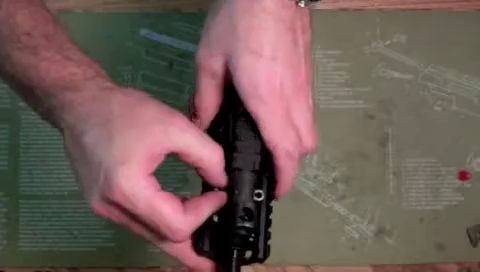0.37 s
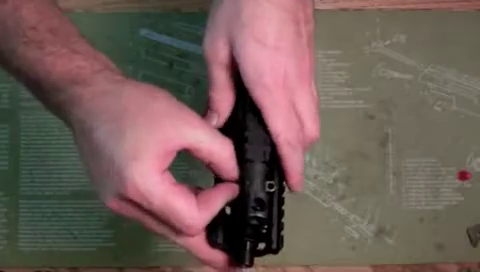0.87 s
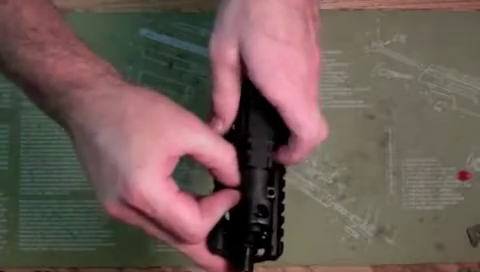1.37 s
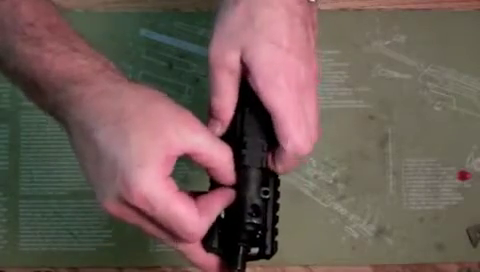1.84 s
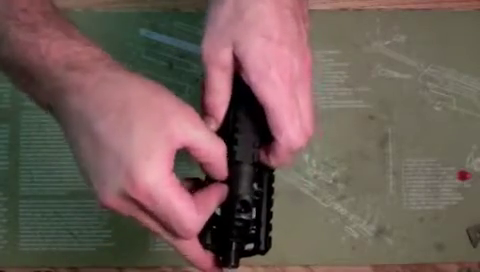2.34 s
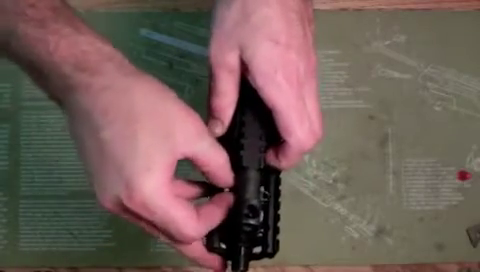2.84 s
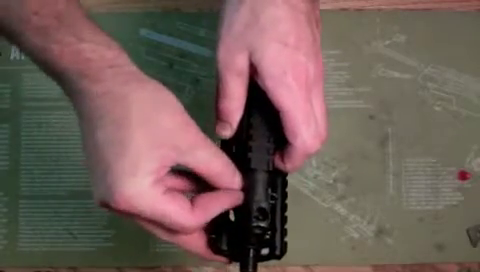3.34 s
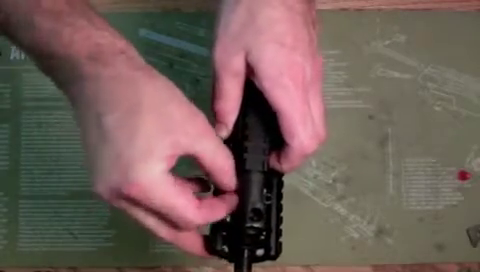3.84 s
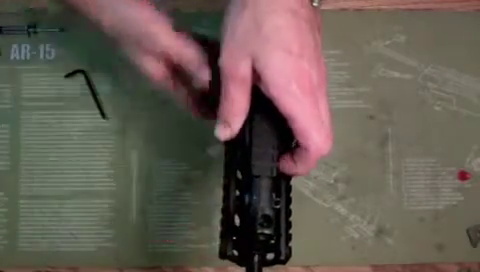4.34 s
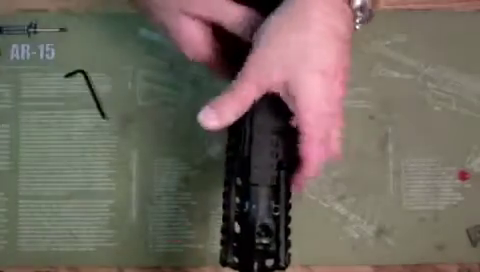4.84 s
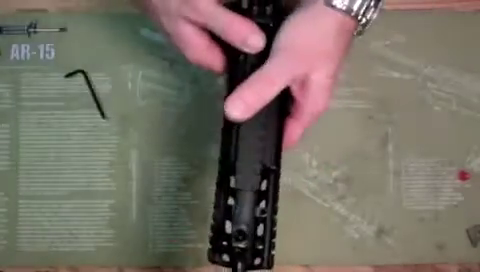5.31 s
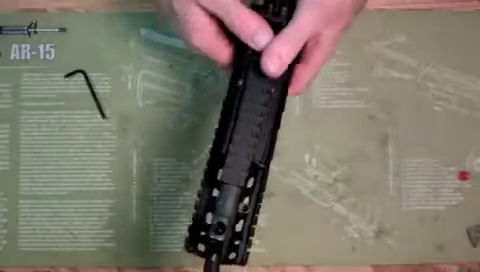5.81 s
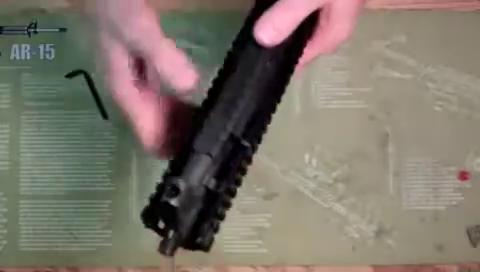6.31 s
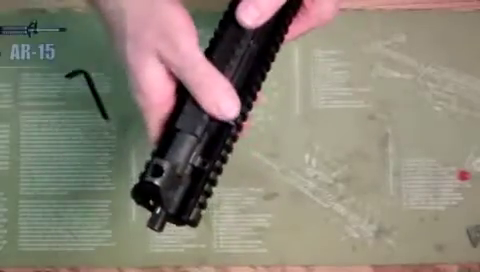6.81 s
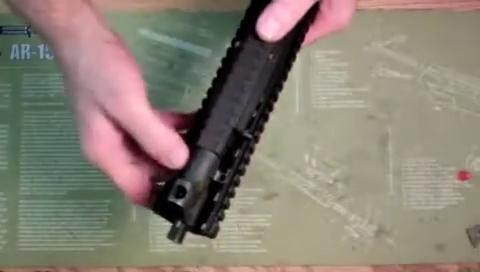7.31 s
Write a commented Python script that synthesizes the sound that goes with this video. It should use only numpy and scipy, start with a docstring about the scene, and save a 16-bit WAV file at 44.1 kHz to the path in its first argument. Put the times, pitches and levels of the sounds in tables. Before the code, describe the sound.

A close stereo microphone in a small quiet room, with steady soft hiss and faint low hum throughout. From 0 to 1 s, light skin brushing and faint dull taps on a padded bench. At 1.2 s a bright small tick and a brush of skin, then a paired click at 1.7 s. From 2.1 to 2.9 s, sharp, dry metal snaps, loudest at 2.2 and 2.4 s, with gritty thread slips between. From 3.3 to 3.7 s, a dense run of grinding creaks and scrapes. Around 4.0 s a small steel key lands with a quick double clink and a very high, fluttering ping. From 4.4 to 6.3 s, mostly soft hand rubbing, with a dull knock at 4.8 s and a tick at 5.3 s. Muffled taps come near 6.5 s, then a short metal slip at 7.4 s and a faint final tap as low rumble rises slightly.

```python
"""Padded bench in a small quiet room: hands loosen and slide the parts of a slotted metal tube.
Knocks, slips and scrapes ring damped tube and bench modes; loose parts tick on single modes.
A small steel key pings with a beating pair of modes; skin brushes metal and mat as shaped noise.
Microphone hiss, faint hums and low room tone lie beneath; random echoes scatter the metal sounds."""
import sys
import numpy as np
from scipy import signal
from scipy.fft import rfft, irfft
from scipy.io import wavfile
from scipy.ndimage import uniform_filter1d

SR = 44100
rng = np.random.default_rng(int(sys.argv[2]) if len(sys.argv) > 2 else 0)


def voltage_ratio(level):
    """Linear amplitude factor for a level in decibels (scalar or array-like)."""
    return 10 ** (np.asarray(level, float) / 20)


def master_out(mix):
    """Clip the mix to full scale and print it as 16-bit PCM to the path in sys.argv[1]."""
    frames = np.transpose(np.atleast_2d(mix))
    ceiling = np.clip(frames, -1, 1)
    pcm = np.round(ceiling * 32767).astype(np.int16)
    wavfile.write(sys.argv[1], SR, pcm)


N = 338688  # samples


def evened(x):
    """Scales to rms 1."""
    return x / np.sqrt(np.mean(x ** 2) + 1e-20)


def read(points, hz):
    """Reads a curve on a log-frequency axis."""
    point_hz, value = np.transpose(points)
    return np.interp(np.log(hz + 1), np.log(point_hz + 1), value)


def add(mix, s, sound):
    """Mixes a sound in at time s."""
    part = mix[round(s * SR):][:len(sound)]
    part += sound[:len(part)]


def band(x, lo_hz, hi_hz):
    """Band-pass."""
    return signal.sosfilt(signal.butter(2, [lo_hz, hi_hz], "bandpass", fs=SR, output="sos"), x)


def hiss(spectrum, same, patchy_db):
    """Two-channel noise of a given colour and left-right likeness, in faint random patches."""
    hz = np.fft.rfftfreq(2048, 1 / SR)
    a, b, c, d, patches = rng.standard_normal((N // 512 + 5, 1025, 5)).T
    patches = uniform_filter1d(patches, size=20, axis=0)
    patches = evened(uniform_filter1d(patches, size=5, axis=1))
    same = np.clip(read(same, hz), -1, 1)[:, None]
    left = a + 1j * b
    right = same * left + np.sqrt(1 - same ** 2) * (c + 1j * d)
    z = np.array([left, right]) * voltage_ratio(read(spectrum, hz)[:, None] + patchy_db * patches)
    return evened(signal.istft(z, nperseg=2048, noverlap=1536)[1][:, :N])


FOOT_DB = -17  # where a stroke's rise starts and its fall ends


def stroke(rows):
    """Gain over time: every stroke rises, holds and falls away."""
    t, gain = np.arange(N) / SR, np.zeros(N)
    for s, rise_s, hold_s, fall_s, db in rows:
        corners_s = np.cumsum([s - rise_s, rise_s, hold_s, fall_s])
        shape_db = np.interp(t, corners_s, [FOOT_DB, 0, 0, FOOT_DB])
        gain += voltage_ratio(db) * (voltage_ratio(shape_db) - voltage_ratio(FOOT_DB))
    return gain


def ring(modes, phase=0):
    """Impulse response of a set of dying modes, 1/12 s long."""
    hz, db, t60 = np.transpose(modes)[:, :, None]
    t = np.arange(SR // 12) / SR
    return (voltage_ratio(db - 60 * t / t60) * np.sin(2 * np.pi * (hz * t + phase))).sum(0)


def cluster(modes, luck, spread, uneven_db, tilt_db=0):
    """Each mode is a family of three close neighbours; grip and place shift and weigh them anew."""
    hz, db, t60 = np.repeat(modes, 3, axis=0).T
    shift, weight, phase = luck[:, :len(hz)]
    db = db + uneven_db * weight + tilt_db * np.clip(np.log2(hz / 3100) / 1.48, 0, 1)
    return ring(np.transpose([hz * (1 + spread * shift), db, t60]), phase[:, None])


def echoes(x, decay, first):
    """Sparse random-sign taps from sample `first` on, each band dying at its own speed.
    The work moves about, so three such paths take turns."""
    taps = np.zeros((3, 2, SR // 2))
    at = np.arange(first, SR // 2 - 20, 20)
    at_jittered = at + rng.integers(0, 20, (3, 2, len(at)))
    np.put_along_axis(taps, at_jittered, rng.choice([-1., 1.], (3, 2, len(at))), 2)
    hz, t, z = signal.stft(taps, SR, nperseg=128)
    tail = signal.istft(z * voltage_ratio(-60 * t / read(decay, hz)[:, None]), SR, nperseg=128)[1]
    tail = signal.lfilter([1, -.6], 1, tail)  # small hard things scatter the treble most
    path = np.arange(3)[:, None, None]
    turns = np.sqrt(2 / 3) * np.cos(np.pi * (7 * np.arange(N) / SR + path / 3))
    return signal.oaconvolve(x * turns, tail / np.linalg.norm(tail[0, 0]), axes=2)[..., :N].sum(0)


# Hiss colour. Each row: frequency in Hz, relative density in dB per Hz.
HISS_COLOUR = [(12, -29), (20, -8.5), (63, -11.5), (86, -13), (196, -14.5), (244, -5), (280, -11.5),
               (390, -10.5), (513, -11), (940, -8), (1380, -12.5), (3330, -11.5), (4150, -12), (7000, -12),
               (14300, -10.5)]
# Hiss across the microphone pair. Each row: frequency in Hz, left-right likeness (0 to 1).
HISS_LIKENESS = [(60, 0.81), (150, 0), (380, 0.49), (950, 0.37), (2370, 0.069), (5960, 0), (14900, 0.0)]
# Wavering hum lines. Each row: centre in Hz, width in Hz, level in dB.
HUMS = [(57.9, 4.1, -77), (245.5, 25, -75.5), (7870, 33, -75.5), (13950, 300, -69.5)]
HISS_DB, RUMBLE_DB = -54, -67.5
SWELL_S, SWELL_DB_PER_S = 7.45, 34  # the low rumble swells from SWELL_S on


def room_tone():
    """Noise sources: microphone hiss and air, narrow wavering hums, low rumble."""
    out = voltage_ratio(HISS_DB) * hiss(HISS_COLOUR, HISS_LIKENESS, patchy_db=1.45)
    for hz, width_hz, db in HUMS:
        out += voltage_ratio(db) * evened(band(rng.standard_normal(N), hz - width_hz / 2, hz + width_hz / 2))
    swell_db = SWELL_DB_PER_S * np.maximum(np.arange(N) / SR - SWELL_S, 0)
    rumble = evened(band(rng.standard_normal((2, N)), 86, 584))
    return out + voltage_ratio(RUMBLE_DB + swell_db) * rumble


# Wall decay. Each row: frequency in Hz, t60 in s.
WALL_DECAY = [(300, 0.44), (2500, 0.2), (8000, 0.18), (14000, 0.079)]


def wall_echoes(x):
    """Late diffuse return from the walls, after 200 samples."""
    return voltage_ratio(-7.5) * echoes(x, WALL_DECAY, first=200)


# Decay of scatter from hands and bench. Each row: frequency in Hz, t60 in s.
NEAR_DECAY = [(1000, 0.15), (10000, 0.054)]


def near_scatter(x):
    """Early return from hands and bench, after 4 samples."""
    return voltage_ratio(-5) * echoes(x, NEAR_DECAY, first=4)


# Skin over metal and mat. Each row: full from in s, rise in s, hold in s, fall in s, level in dB.
BRUSH_STROKES = [(0.005, .005, 0.011, .08, -58.5), (0.15, .02, .11, .02, -58),
                 (0.33, .03, 0.095, .03, -61.5), (1.19, .02, .125, 0.033, -52),
                 (4.43, .03, 0.049, .03, -54), (4.498, 0.035, 0.0089, 0.11, -48.5),
                 (4.662, 0.027, .005, 0.062, -50.5), (4.94, 0.17, 0.14, .1, -54.5),
                 (5.51, 0.16, 0.15, .07, -55), (5.78, 0.048, 0.15, .11, -54.5),
                 (6.066, 0.072, 0.018, .12, -54.5), (6.198, .02, .01, .08, -57),
                 (6.96, 0.13, .03, .14, -57.5)]
# Skin noise colour. Each row: frequency in Hz, relative density in dB per Hz.
SKIN_COLOUR = [(880, -14), (1500, -4), (2720, -3), (3750, 0.5), (8920, -0.5), (13500, 6), (14300, -27)]


def brushing():
    """Soft broad hiss, slightly lumpy as skin sticks and slips."""
    lumps = evened(uniform_filter1d(rng.standard_normal(N), size=300))
    skin = hiss(SKIN_COLOUR, [(1000, 0.44), (14000, 0.17)], patchy_db=1.5)
    return skin * stroke(BRUSH_STROKES) * voltage_ratio(1.5 * lumps)


# Key landing and bouncing, a brief flare of loudness per contact.
# Each row: time in s, left dB, right dB.
BOUNCES = [(4.0116, -7.3, -14), (4.0178, -10.8, -11)]
# Close pair of key modes. Each row: frequency in Hz, left dB, right dB, t60 in s.
KEY_MODES = [(13364, -4.2, -6.4, .104), (13340, -12, -8.2, .104)]
# Times in s at which the pair cancels: left, right.
BEAT_NULL_S = [4.0497, 4.059]
FLARE_S, KEY_RISE_S = .0019, .004
KEY_LEAD_TURNS = 0.2  # right ahead of left, in turns


def key():
    """Two very high steel modes beat as they die; each side has its own level and phase."""
    t = np.arange(SR // 4) / SR
    start_s = BOUNCES[0][0] - 2 * FLARE_S
    rise = np.minimum(t / KEY_RISE_S, 1) ** 2
    (hz, *main_db, main_t60), (twin_hz, *twin_db, twin_t60) = KEY_MODES
    main = voltage_ratio(np.c_[main_db] - 60 * t / main_t60) * rise
    for s, *sides_db in BOUNCES:
        main += voltage_ratio(np.c_[sides_db]) * np.exp(-((t + start_s - s) / FLARE_S) ** 2) * (t > 0)
    twin = voltage_ratio(np.c_[twin_db] - 60 * t / twin_t60) * rise
    turns = hz * t + np.c_[[0, KEY_LEAD_TURNS]]
    slip = (twin_hz - hz) * (t + start_s - np.c_[BEAT_NULL_S])
    ping = main * np.sin(2 * np.pi * turns) - twin * np.sin(2 * np.pi * (turns + slip))
    out = np.zeros((2, N))
    out[:, round(start_s * SR):][:, :len(t)] = ping
    return out


# Loose small part, one pitch per tick. Each row: time in s, peak in dB before mixing, Hz, t60 in s.
TICKS = [(0.5457, -54, 730, 0.041), (0.6255, -43, 694, .025), (1.16, -32, 4640, 0.094),
         (4.665, -44.5, 5490, 0.071), (5.307, -36, 860, 0.022)]


def ticks():
    """One mode and the dry click of contact, rising over a few cycles."""
    out = np.zeros(N)
    for s, peak_db, hz, t60 in TICKS:
        sound = ring([(hz, 0, t60), (2200, -3, .01)])
        sound *= 1 - np.exp(-np.arange(len(sound)) / SR * hz / 4.3)
        add(out, s - .001, voltage_ratio(peak_db) * sound / abs(sound).max())
    return out


# Bench under the mat, most modes nearly dead. Each row: Hz, relative level in dB, t60 in s.
BENCH = [(386, 1, 0.031), (490, 1, 0.0043), (754, -6.5, 0.0061), (1098, -6, 0.11), (1150, -22.5, 0.032),
         (1400, -6.5, 0.069), (2090, 3.5, 0.044)]


def bench_ring(luck):
    """Impulse response of the padded bench."""
    return cluster(BENCH, luck, spread=0.1117, uneven_db=2.5)


# Tube modes, damped by the gripping hand. Each row: Hz, relative level in dB, t60 in s.
TUBE = [(1710, -12, 0.14), (2040, -12, 0.17), (2277, -2, 0.04), (2410, -6.5, 0.038), (2530, 1, 0.047),
        (2703, 5, 0.011), (2970, -1.5, 0.024), (3074, 5.5, 0.023), (3240, 1.5, 0.0076), (3756, 5, 0.02),
        (3950, 1, 0.032), (4650, 0.5, 0.022), (5490, 7.5, 0.011), (6190, 2.5, 0.0072), (6960, -7.5, 0.038),
        (7360, 4, 0.0052), (8170, 7, 0.023), (8580, -4.5, 0.043), (9660, -15, 0.04), (10370, -4.5, 0.022),
        (12900, -32, 0.016), (12800, 16, 0.0058), (14050, 7.5, 0.033)]


def tube_ring(luck, spread, uneven_db, tilt_db):
    """Impulse response of the gripped tube; tilt_db weighs the modes above 3100 Hz."""
    return cluster(TUBE, luck, spread, uneven_db, tilt_db)


# Threads and edges dragging. Each row: full from in s, rise in s, hold in s, fall in s, level in dB.
SCRAPE_STROKES = [(1.27, 0.13, .05, .03, -55), (2.326, 0.011, 0.021, .02, -48.5),
                  (2.755, .02, 0.017, 0.036, -55), (2.897, 0.023, 0.018, 0.055, -51.5),
                  (3.31, 0.033, 0.042, 0.11, -48.5), (3.465, .015, 0.017, .03, -53),
                  (3.5, 0.027, .04, .1, -53), (3.66, .03, 0.025, 0.069, -50), (4.5, 0.096, .01, .03, -54),
                  (7.445, .005, .01, .09, -55), (7.562, .01, .01, 0.13, -63)]


def scrapes():
    """Dense uneven slips, 2500 a second, ring the tube while a part drags."""
    size = voltage_ratio(3.5 * np.minimum(rng.exponential(1, N), 4))
    slips = (rng.random(N) < 2500 / SR) * size * rng.choice([-1, 1], N)
    body = tube_ring(rng.standard_normal((3, 3 * len(TUBE))), spread=.015, uneven_db=1, tilt_db=-2)
    drag = evened(slips) * stroke(SCRAPE_STROKES)
    return signal.oaconvolve(drag, body / np.linalg.norm(body))[:N]


SING_DB = -7  # strength of the pitch that the touched spot sings


def strike(s, level_db, sing_hz, thud_db, treble_db, contact_s):
    """A gritty contact rings tube and bench, and the touched spot sings one pitch."""
    grit, luck = rng.standard_normal(2000), rng.standard_normal((3, 3 * len(TUBE)))
    u = np.arange(len(grit)) / SR / contact_s
    push = u ** 1.71 * np.exp(-2.6 * u)
    blow = grit * abs(grit) ** 0.66 * push  # spiky noise: a cluster of micro-impacts
    z = rfft(blow)
    blow = irfft(z / (abs(z) + 1e-9) ** .8) * push ** .4  # flattened: no pitch of its own

    metal = signal.fftconvolve(blow, tube_ring(luck, 0.025, -1.0, treble_db))
    # the many short modes too dense to tell apart
    crack = band(blow, 1700, 3500) + voltage_ratio(-13.5) * band(blow, 1080, 1610)
    crack += voltage_ratio(treble_db * 0.64) * band(blow, 4040, 5890)
    crack += voltage_ratio(treble_db) * band(blow, 5800, 10300)
    crack += voltage_ratio(treble_db - 10) * band(blow, 8400, 15300)
    metal[:len(blow)] += voltage_ratio(37) * crack

    wood = band(signal.fftconvolve(blow, bench_ring(luck)), 280, 3300)
    wood[:len(blow)] += voltage_ratio(34.5) * band(blow, 460, 2140)  # the dead thump of the mat

    sound = metal / abs(band(metal, 2380, 4260)).max() + voltage_ratio(thud_db) * wood / abs(wood).max()
    sing = np.cumsum(push) * ring([(sing_hz, 0, .02)])[:len(push)]
    add(sound, 0, voltage_ratio(SING_DB) * sing / abs(sing).max())
    return s - .55 * contact_s, voltage_ratio(level_db) * band(sound, 430, 11100)


# Thread slips. Each row: time in s, level in dB, pitch the spot sings in Hz, treble tilt in dB.
JOLTS = [(1.3035, -46.5, 3260, 3), (2.0881, -26, 2845, -2.5), (2.3286, -33.5, 2610, -11),
         (2.339, -43, 2580, -10), (2.5949, -36, 3450, -9), (2.7709, -36.5, 3880, -19),
         (3.2915, -46, 2910, -20), (3.3206, -38, 2570, -8), (3.3358, -32, 2410, -16),
         (3.402, -38, 2310, -28), (3.494, -42, 2690, -24), (3.5027, -35, 3020, -3.5),
         (3.5137, -26, 2935, -0.5), (3.5296, -34, 2530, -39), (3.5908, -44.5, 2460, -29),
         (3.6465, -41.5, 2230, -5), (3.6722, -32, 2970, -31), (3.681, -35.5, 2610, -8),
         (4.4856, -45.5, 8500, 1), (7.4363, -32, 3900, -3)]
JOLT_CONTACT_S, JOLT_THUD_DB = 0.0069, -25


def jolts():
    """Longer grinding contacts as a thread slips, hardly reaching the bench."""
    out = np.zeros(N)
    for s, level_db, sing_hz, treble_db in JOLTS:
        add(out, *strike(s, level_db, sing_hz, JOLT_THUD_DB, treble_db, JOLT_CONTACT_S))
    return out


# Sharp knocks on the tube. Each row: time in s, level in dB, pitch the spot sings in Hz,
# bench thud in dB relative to the metal, treble tilt in dB.
KNOCKS = [(0.6252, -45, 1470, -2, -9), (0.6953, -51, 751, -10, 2), (0.8512, -36.5, 1690, -4, -36),
          (0.895, -47.5, 8700, 3, 4), (0.9324, -49, 716, -4, -4), (0.963, -56, 7960, 6, 12),
          (1.1608, -39.5, 4870, -9, 21), (1.174, -47, 7950, -17, 10), (1.715, -32, 3240, -8.5, -5),
          (1.7312, -32, 3370, -4.5, -4), (1.9469, -46.5, 810, 4.5, -20), (2.0915, -37.5, 1170, 0, -5),
          (2.2219, -17.5, 2860, -42, -6.5), (2.2745, -39, 2410, -38, -13), (2.3605, -20, 2315, -39, -4),
          (2.4234, -41, 2260, -27, -3), (2.4987, -25.5, 2600, -2, -3), (2.6743, -53, 2500, -16, -14),
          (2.7072, -32, 2630, -41, -24), (2.9045, -31.5, 2234, -40, -24), (3.3018, -39.5, 2690, -28, -15),
          (3.3494, -30.5, 2880, -27, -8), (3.662, -38, 2550, -26, 5), (3.9402, -31, 4180, -10.5, 4.5),
          (4.009, -26.5, 3110, -50, 12), (4.0157, -27.5, 2974, -38, -4), (4.045, -38, 3900, -36, 0),
          (4.1856, -51.5, 1340, -7, -16), (4.2039, -51.5, 1030, -2, -21), (4.592, -50, 7880, -14, 11.5),
          (4.794, -33.5, 2355, -0.5, -46), (4.9335, -55.5, 8000, -11, 19), (5.9302, -55, 9300, 1, 10),
          (6.0791, -55, 3610, 5, -3), (6.2018, -50, 1650, 2, 1.5), (6.4962, -41, 1650, 3.5, -17),
          (6.6147, -48, 1730, 7, -24), (7.5565, -46, 10200, -12, 7)]
KNOCK_CONTACT_S = 0.00215


def knocks():
    """Short contacts ring tube and bench together."""
    out = np.zeros(N)
    for row in KNOCKS:
        add(out, *strike(*row, KNOCK_CONTACT_S))
    return out


def scene():
    """Direct sound of all sources; hands, bench and walls scatter the tube and the small part."""
    metal = scrapes() + jolts() + knocks()
    small = ticks()
    near = near_scatter(metal + small)
    walls = wall_echoes(metal + 0.16 * small)  # cupped hands shield the small part
    return room_tone() + walls + near + brushing() + key() + voltage_ratio(-2) * (metal + small)


def low_pass(x):
    """Removes everything above the highest recorded frequency."""
    return signal.sosfilt(signal.butter(12, 15540, fs=SR, output="sos"), x)


def record(dry):
    """Left 0.45 dB up, right 0.45 dB down; low-pass at 14330 Hz."""
    edge = signal.firwin(301, 14330, window=("kaiser", 5.0), fs=SR)
    sides = dry * voltage_ratio([[.45], [-.45]])
    return low_pass(signal.oaconvolve(sides, edge[None], "same"))


dry = scene()
out = record(dry)
master_out(out)
```